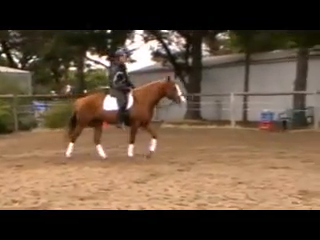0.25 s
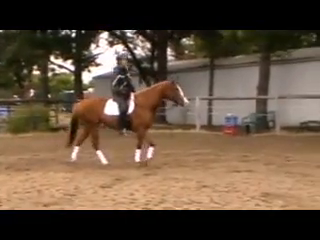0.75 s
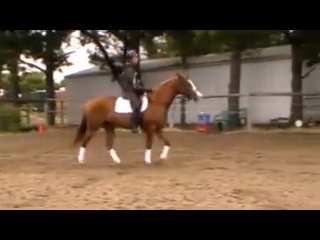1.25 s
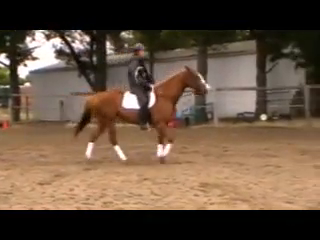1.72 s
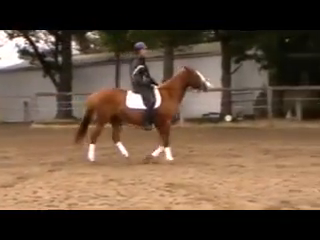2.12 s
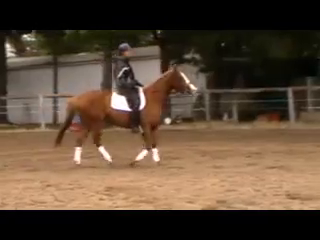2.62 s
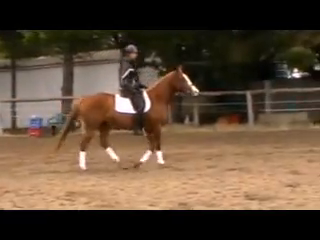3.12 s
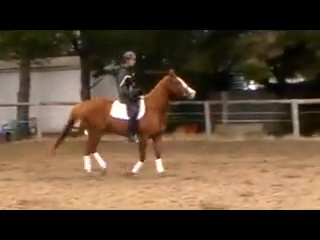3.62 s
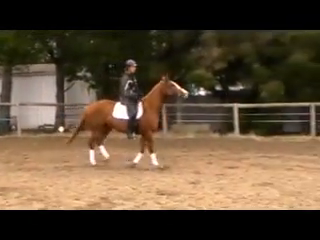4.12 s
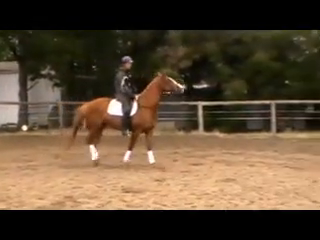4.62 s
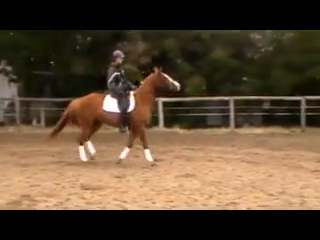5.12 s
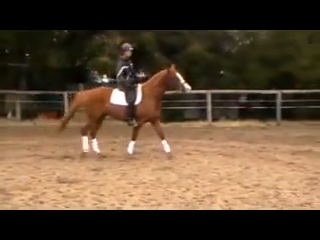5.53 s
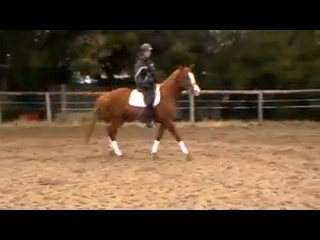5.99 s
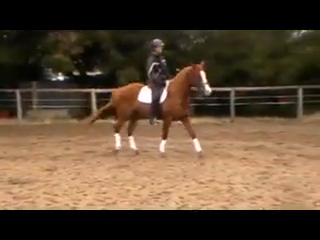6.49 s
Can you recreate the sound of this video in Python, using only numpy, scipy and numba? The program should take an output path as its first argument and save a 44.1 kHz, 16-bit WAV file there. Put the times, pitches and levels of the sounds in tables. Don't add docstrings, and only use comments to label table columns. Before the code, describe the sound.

Small birds chirp over wind-buffeted air and soft hoofsteps on sand, then a nearby horse gives a short shrill whinny, a quavering trill and a grunt.

```python
import sys
import numpy as np
from scipy import signal
from scipy.fft import rfft, irfft
from scipy.io import wavfile
from scipy.ndimage import uniform_filter1d
from numba import njit

SR = 44100
rng = np.random.default_rng(int(sys.argv[2]) if len(sys.argv) > 2 else 0)


def natural_amplitude(level_db):
    exponent = np.asarray(level_db, float) / 20
    return 10 ** exponent


def dump(signal):
    limited = np.clip(np.atleast_2d(signal).T, -1, 1)
    pcm = np.round(limited * 32767).astype(np.int16)
    wavfile.write(sys.argv[1], SR, pcm)


N = 297807

# from t/s, whole lines level/dB, half lines level/dB, upper lines level/dB, waver 0-1
REGISTERS = [
    (0, 0, -28, -11, .5),
    (4.25, -8, 0, 7, 0.09),
    (4.398, -1.3, -7, -2.5, 0.83),
]
# t/s, centre f/Hz, swing of the quaver f/Hz, effort level/dB
TRILL = [(4.64, 237.7, 27, -22), (4.68, 258, 21, -20), (4.9, 256.2, 31.4, -21), (5.03, 212.7, 38.2, -18),
         (5.22, 189.7, 34.6, -15.5), (5.275, 160, 22.5, -20.5), (5.33, 158.5, 3.06, -12),
         (5.375, 153.3, 1.14, -31.5), (5.52, 149.5, 1.4, -50)]
# from t/s, tilt/dB per octave
CLOSING = [(0, -4), (5.255, -7)]
# f/Hz, width/Hz, level/dB
THROAT = [(563, 43, -3), (967, 37, -2), (1620, 80, 4), (1982, 30, 1), (2262, 34, 6.5), (3220, 520, 1),
          (3800, 26, -4), (4200, 21, -21), (5770, 41, -6.5)]
# f/Hz, width/Hz, level/dB
GRUNT_THROAT = [(579, 17, -2), (1018, 31, 0.5), (1555, 26, -4), (1925, 47, -6), (2940, 45, -5),
                (3550, 70, -8), (4900, 200, -10)]


def level(x, db):
    return x * natural_amplitude(db) / np.sqrt(np.mean(x ** 2))


def curves(table):
    s, *columns = np.transpose(table)
    t = np.arange(N) / SR
    gate = np.clip(np.minimum(t - s[0], s[-1] - t) / 0.019, 0, 1)
    return [np.interp(t, s, c) for c in columns] + [gate]


def stages(table):
    s, *columns = np.transpose(table)
    row = np.searchsorted(s, np.arange(N) / SR, "right") - 1
    return [uniform_filter1d(c[row], int(.015 * SR)) for c in columns]


def noise():
    return rng.standard_normal(N)


def colour(x, points):
    hz, db = np.transpose(points)
    f = np.maximum(np.arange(N // 2 + 1) * SR / N, 1)
    return level(irfft(rfft(x) * natural_amplitude(np.interp(np.log(f), np.log(hz), db)), N), 0)


def walk(rate):
    k = int(SR / rate)
    held = np.repeat(rng.standard_normal(N // k + 1), k)
    return 1.5 * uniform_filter1d(uniform_filter1d(held, k), k)[:N]


def turn(hz):
    return 2 * np.pi * np.cumsum(hz) / SR


@njit
def sweep(x, hz, width):
    y, b, l = np.empty(len(x)), 0., 0.
    for i in range(len(x)):
        g, k = np.tan(np.pi * hz[i] / SR), width / hz[i]
        v = (b + g * (x[i] - l)) / (1 + g * (g + k))
        b, l, y[i] = 2 * v - b, l + 2 * g * v, k * v
    return y


def svf(x, hz, width):
    return sweep(x, hz * np.ones(len(x)), 1. * width)


def twice(x, hz, width):
    return svf(svf(x, hz, width), hz, width)


def dull(x):
    return signal.sosfilt(signal.ellip(8, .3, 50, 11500, fs=SR, output="sos"), x)


def air():
    # f/Hz, level/dB per Hz
    spectrum = [(15, -37), (25, -0.5), (103, -2.5), (456, -9), (712, -7), (833, -13), (1030, -11),
                (1920, -19), (2140, -19.5), (7700, -25), (11250, -34.5), (11600, -88), (13000, -95)]
    # f/Hz, level/dB
    unshared = [(60, -2.5), (250, -23), (600, -11), (1500, -5.5), (4000, -2), (13000, 2.5)]
    mid = colour(noise(), spectrum)
    side = level(colour(colour(noise(), spectrum), unshared), -12)
    return natural_amplitude(-47.5 + walk(4.49)) * (mid + side * np.array([[1], [-1]]))


def wind():
    # t/s, level/dB
    gusts = [(0.0, -37), (0.17, -42), (0.45, -28), (0.51, -48), (0.62, -31.5), (1.03, -60), (1.67, -37.5),
             (1.77, -62), (1.96, -43), (3.8, -60), (4.04, -61), (4.14, -44.5), (4.27, -59), (4.48, -41.5),
             (5.75, -46.5), (5.81, -35.5), (6.36, -44.5), (6.75, -28.5)]
    # f/Hz, level/dB per Hz
    eddy_spectrum = [(12, -49), (20, -35), (44, 0), (127, 2), (340, -13), (420, -19), (824, -32.5),
                     (1310, -38.5), (2000, -57), (2600, -76), (4400, -120)]
    # t/s, peak level/dB, left minus right level/dB
    pops = [(0.114, -21, -4), (0.242, -42, -8), (0.262, -22.5, -13), (0.351, -17, -10), (0.372, -18.5, -10),
            (0.45, -29, -1), (0.618, -21.5, 7), (0.684, -19.5, 0), (1.625, -24, 8), (1.653, -20, 15),
            (1.95, -29, 17.5), (2.049, -25, 9), (6.569, -22.5, -8), (6.712, -30, 1)]
    db, _ = curves(gusts)
    shared, out = noise(), []
    grit = level(twice(shared, 600., 700.), 0)
    u = np.arange(700) / SR
    thump = (1 - np.exp(-u / .0004)) * np.sin(2 * np.pi * 170 * u + .5) * np.exp(-u / .004)
    crackle = u / .0025 * np.exp(1 - u / .0025)
    for side in (1, -1):
        eddies = colour((0.95 * shared + noise()) * natural_amplitude(3.2 * walk(25)), eddy_spectrum)
        upper = svf(svf(eddies, 350.0, 720.0), 290.0, 1000.0)
        port = natural_amplitude(db + side * 0.7 + 5.5) * (eddies - upper + natural_amplitude(0.21 * (db + 38.5)) * upper)
        for s, pop_db, pan_db in pops:
            i = int(s * SR)
            port_db = pop_db + side * pan_db / 2
            port[i:i + 700] += natural_amplitude(port_db) * thump
            port[i:i + 700] += natural_amplitude(port_db - 21) * grit[i:i + 700] * crackle
        out.append(port)
    return np.array(out)


def sand():
    return noise() * natural_amplitude(1.2 * rng.exponential(1, N // 40 + 1)).repeat(40)[:N]


def hooves():
    # t/s, spray peak level/dB, low thud level/dB
    steps = [(0.9537, -49, -65), (1.5204, -47.5, -48), (2.0194, -48, -64), (2.485, -43, -51),
             (2.9904, -50, -57), (3.483, -52, -49), (3.5508, -51, -48), (5.6173, -43, -46.5)]
    t, spray, thud = np.arange(N) / SR, 0, 0
    for s, db, thud_db in steps:
        fade = (t > s) * np.exp(-np.maximum(t - s, 0) / 0.023)
        spray = spray + natural_amplitude(db) * fade
        thud = thud + natural_amplitude(thud_db) * fade
    grains = level(svf(svf(sand(), 7500.0, 4100.0), 5100.0, 5800.0), -2.4)
    return dull(spray * grains + thud * level(svf(noise(), 370.0, 800.0), 0))


def drag():
    # t/s, level/dB
    pull = [(2.82, -77), (2.87, -53), (3.03, -55)]
    db, gate = curves(pull)
    grains = sand()
    scrape = level(svf(grains, 1870.0, 700.), 0)
    scrape = scrape + level(svf(grains, 3400.0, 1500.), -1.5)
    scrape = scrape + level(svf(grains, 5900.0, 3000.), -19)
    return dull(gate * natural_amplitude(db) * scrape)


def tack():
    # t/s, peak level/dB, centre f/Hz, width as a share of the centre
    ticks = [(0.033, -39, 5600, 0.16), (0.591, -30, 7300, 0.35), (1.017, -42, 8100, 0.15),
             (2.717, -43, 7500, 0.47), (4, -33, 2080, 0.21), (4.034, -18.5, 4500, 1.8),
             (4.075, -33, 2220, 0.71), (4.105, -34, 3150, 0.57), (2.066, -44, 4500, .6),
             (5.504, -39, 8790, 0.36), (5.569, -42, 9060, 0.38), (5.737, -36, 3470, 1),
             (6.252, -31, 3300, .9)]
    out, snap = np.zeros(N), noise()
    for s, db, hz, share in ticks:
        i = int(s * SR)
        burst = snap[i:i + 600] * np.exp(-np.arange(600) / (.0016 * SR))
        width = hz * np.clip(share, .1, 2)
        burst = svf(svf(burst, 1. * hz, width), 1. * hz, 2 * width)
        out[i:i + 600] += natural_amplitude(db) * burst / np.abs(burst).max()
    return out


def strokes(bird, rise, fall, hook, arch):
    pitches = {"rise": lambda d, top: (top - rise * d, top - 0.51 * rise * d, top),
               "hook": lambda d, top: (hook * top, top - 0.144 * (1 - hook) * top, top),
               "flat": lambda d, top: (top, top, top),
               "arch": lambda d, top: (arch * top, top, arch * top),
               "fall": lambda d, top: (top, top - 0.57 * fall * d, top - fall * d)}
    return [(s, d, *pitches[shape](d, top), db) for shape, rows in bird.items() for s, d, top, db in rows]


def birds(song, warble, flutter_db, second_db, burr):
    out, shake, flutter, grit = np.zeros(N), walk(300), walk(250), walk(2500)
    breath = level(twice(noise(), 9000.0, 2200.0), -28)
    for s, length, start_hz, middle_hz, end_hz, db in song:
        u = np.linspace(0, 1, int(length * SR))
        i = int(s * SR) + np.arange(len(u))
        glide = np.polyval(np.polyfit([0, .5, 1], [start_hz, middle_hz, end_hz], 2), u)
        phase = turn(glide * (1 + warble * shake[i] * min(1., 0.0318 / length)))
        swell = np.sin(np.pi * u) ** .45 * natural_amplitude(db + flutter_db * flutter[i])
        out[i] += swell * ((1 + burr * grit[i]) * np.sin(phase) + breath[i])
        octave = np.clip((7000 - glide) / 1200, 0, 1) * (end_hz > start_hz)
        out[i] += swell * octave * natural_amplitude(second_db) * (1 + .5 * grit[i]) * np.sin(2 * phase)
    return out


def high_bird():
    song = { "rise": [(1.067, 0.036, 6300, -47), (1.779, 0.054, 6900, -38), (2.325, 0.017, 6660, -38),
            (6.343, 0.013, 6300, -30)], "hook": [(1.1, 0.053, 6800, -36), (4.295, 0.06, 7480, -26.5),
            (4.42, 0.056, 7470, -33), (6.108, 0.038, 7300, -31), (6.425, 0.036, 6620, -26),
            (6.592, 0.0454, 7520, -23), (2.305, 0.024, 5330, -46), (6.325, 0.03, 5180, -40)],
            "arch": [(1.79, 0.043, 7050, -32.5), (1.82, 0.033, 6930, -29.5), (2.34, 0.036, 7050, -28),
            (5.837, 0.032, 7090, -22.5), (6.358, 0.05, 6830, -25), (6.39, 0.045, 7170, -30)],
            "flat": [(0.003, .06, 7300, -55), (.07, .025, 7100, -58)], "fall": [(2.365, 0.016, 6900, -38),
            (6.638, .022, 7400, -33)]}
    song = strokes(song, rise=51500, fall=85000, hook=.89, arch=0.84)
    return birds(song, warble=0.0083, flutter_db=2.9, second_db=-15, burr=0.18)


def low_birds():
    climbs = { "rise": [(.553, 0.021, 5330, -42.5), (1.26, 0.041, 4660, -44.5), (2.105, .028, 5320, -40),
              (2.126, .027, 4680, -33.5), (2.163, 0.023, 4530, -44), (3.348, 0.036, 5400, -39),
              (3.36, 0.019, 5210, -58)], "hook": [(.05, 0.043, 4400, -49), (.077, 0.038, 4520, -43),
              (.105, 0.054, 4100, -47), (.572, 0.042, 4220, -32), (.565, .015, 3600, -44),
              (.672, 0.03, 3700, -42), (.952, 0.036, 4430, -40.5), (2.18, 0.03, 3700, -39),
              (2.775, 0.039, 4570, -47.5), (3.04, 0.019, 4230, -54), (3.45, 0.035, 4130, -40.5),
              (6.71, .035, 4480, -51)]}
    drops = { "arch": [(.632, 0.047, 3585, -37.5), (.883, 0.029, 4420, -41.5), (.887, 0.015, 4950, -48),
             (.987, 0.024, 3800, -42.5), (1.14, 0.021, 4780, -47), (1.183, 0.022, 3380, -48),
             (1.293, 0.029, 5060, -31), (1.385, 0.039, 3850, -39), (1.393, 0.023, 4610, -37),
             (2.39, 0.036, 4700, -42.5), (3.183, 0.071, 3940, -47), (2.33, 0.027, 4640, -47),
             (2.365, 0.028, 3800, -47.5), (2.165, 0.011, 5100, -50), (5.6, 0.027, 4350, -46),
             (5.64, 0.029, 4300, -49)], "fall": [(.14, 0.023, 3900, -44), (.724, 0.016, 3650, -45),
             (.606, .01, 3800, -36), (.616, .008, 3700, -36), (.624, .012, 3700, -38),
             (.156, .014, 3500, -47), (1.32, 0.039, 4540, -44), (1.43, 0.013, 4580, -41.5),
             (2.148, 0.013, 3530, -35), (2.205, 0.014, 3510, -33.5), (2.44, 0.039, 4520, -50),
             (2.812, 0.028, 3990, -48), (3.385, 0.016, 5280, -34), (3.39, 0.028, 5200, -46),
             (3.462, 0.02, 5000, -44), (6.395, 0.022, 4870, -34.5), (2.415, .025, 4660, -49),
             (2.143, 0.0062, 5160, -37), (2.078, .008, 4800, -46), (2.085, .008, 4200, -50)]}
    song = strokes({**climbs, **drops}, rise=42000, fall=38000, hook=.79, arch=0.73)
    return birds(song, warble=0.0319, flutter_db=1.84, second_db=-24.0, burr=0.22)


@njit
def walls(x, lags, gain, drift):
    line, out, y = np.zeros((8, 8192)), np.zeros((2, len(x))), np.zeros(8)
    for i in range(len(x)):
        total = 0.
        for k in range(8):
            lag = lags[k] + drift[(i + 4000 * k) % len(x)]
            j = int(lag)
            y[k] = gain[k] * ((j + 1 - lag) * line[k, (i - j) & 8191] + (lag - j) * line[k, (i - j - 1) & 8191])
            out[k % 2, i] += y[k]
            total += y[k]
        for k in range(8):
            line[k, i & 8191] = x[i] + y[k] - total / 4
    return out


def sheds(voice, high, low):
    lags = rng.integers(250, 2300, 8)
    leaves = svf(high + natural_amplitude(1.5) * low, 6100.0, 6700.0) * (.5 + walk(500) + .5 * walk(1800))
    sent = natural_amplitude(-12.0) * leaves + natural_amplitude(-19.0) * voice * (.3 + walk(250))
    echo = dull(walls(sent, lags, natural_amplitude(-60 * lags / SR / 0.5), 4.98 * walk(25)))
    return echo + 0.47 * echo[::-1]


def throat(x, modes, tilt_db, stretch, widen, patchy_db):
    out = 0
    for k, (f, w, db) in enumerate(modes):
        gain = (-1) ** k * natural_amplitude(db + tilt_db * np.log2(f / 1000) + patchy_db * walk(22))
        out = out + gain * svf(x, f * stretch, widen * w) / np.sqrt(w / 100)
    return out


def folds(hz, chest_db, buzz_db, pair, modes, stretch, jitter, scatter_db, tilt_db, second_db, third_db,
          body_db, start_s):
    phase = turn(hz * (1 + jitter * walk(120)))
    phase = np.maximum(phase - phase[int(start_s * SR)], 0)
    cycle = (phase / (2 * np.pi)).astype(int)
    size = natural_amplitude(scatter_db * rng.standard_normal(N // 50))[cycle] * (1 - pair * (cycle % 2))
    clicks = np.diff(cycle, prepend=0) * size * np.sqrt(SR / hz)
    clicks = signal.lfilter([.25], [1, -.75], clicks) * (1 + .5 * noise())
    third = svf(svf(natural_amplitude(2.5 * walk(90)) * np.sin(3 * phase), 578.0, 240.0), 595.0, 270.0)
    chest = np.sin(phase) + natural_amplitude(second_db) * np.sin(2 * phase) + natural_amplitude(third_db) * third
    ring = throat(clicks, modes, tilt_db, stretch, widen=2.2, patchy_db=1.5)
    ring = ring + natural_amplitude(body_db) * svf(clicks, 150.0, 60.0)
    return np.sqrt(2) * natural_amplitude(chest_db) * chest + natural_amplitude(buzz_db + 12.5) * ring, phase


def flaps():
    # t/s, length/s, f/Hz, level/dB
    squeaks = [(5.774, 0.017, 3100, -21), (5.801, .016, 3040, -17), (5.824, 0.0074, 3590, -13),
               (5.83, 0.0088, 3270, -19), (5.845, .008, 3620, -20)]
    out, burr, spit = np.zeros(N), walk(1500), level(svf(noise(), 4500.0, 6500.0), -15)
    for s, length, hz, db in squeaks:
        u = np.linspace(0, 1, int(length * SR))
        i = int(s * SR) + np.arange(len(u))
        tone = np.sin(turn(hz * (1 + 0.067 * (u - .5)))) * (1 + 0.56 * burr[i])
        out[i] += natural_amplitude(db) * np.sqrt(np.sin(np.pi * u).clip(0)) * (tone + spit[i])
    return out


def lips(breath):
    # t/s, centre f/Hz, level/dB
    gap = [(4.55, 3120, -40), (4.62, 3060, -24), (4.76, 3150, -28), (4.85, 3600, -40), (4.94, 3420, -26),
           (5.1, 3340, -27), (5.14, 3360, -40), (5.18, 3300, -29), (5.24, 3600, -45)]
    hz, db, gate = curves(gap)
    return gate * natural_amplitude(db) * level(twice(breath, hz, 350.), 0)


def rasp(puff, breath, stretch, surge_db, gate, grunt_gate):
    # t/s, airflow level/dB, mouth opening as treble level/dB
    flows = [
        [(4.12, -64, -6.5), (4.15, -30.5, -11.5), (4.22, -24.5, 1.5), (4.27, -29, 9.5), (4.4, -21, 2),
         (4.6, -18.5, -4.5)],
        [(4.72, -14, -6.5), (4.88, -16, -7), (5.0, -17.5, -6.5), (5.15, -20, -3), (5.17, -16.5, -9),
         (5.245, -19.5, -7.5), (5.27, -26, -0.5), (5.4, -29, 0), (5.43, -46, 1)],
        [(5.72, -39.5, 2), (5.78, -36, 12.5), (5.95, -29.5, 2), (6.1, -24.5, -2), (6.16, -33.5, -2),
         (6.22, -37, 2.5), (6.272, -41.5, 2), (6.29, -70, -14)],
    ]
    # f/Hz, level/dB per Hz
    hiss_spectrum = [(1470, -21), (2500, 1), (2590, -39), (3340, 1.5), (4700, -7), (5810, -3), (9010, -5),
                     (12200, -17.5), (13600, -43)]
    # from t/s, level over the hiss/dB
    nostrils = [(0, -60), (5.74, -17), (5.88, -5), (5.94, -9), (5.98, -18), (6.145, -10.5), (6.26, -30)]
    db, treble_db, _ = curves(sum(map(list, flows), []))
    tight_db = stages([(0, 0), (REGISTERS[1][0], -9), (REGISTERS[2][0], 0)])[0]
    db, treble_db = db + tight_db + surge_db, treble_db - 0.53 * tight_db
    open_db = 2.5 + 0.21 * treble_db + gate * (stages(CLOSING)[0] - CLOSING[0][1])
    on = curves(list(flows[0]) + list(flows[1]))[-1] + curves(flows[2])[-1]
    low = throat(breath * (1 - grunt_gate), THROAT, open_db - 1.5, stretch, widen=2.1, patchy_db=1.6)
    low += natural_amplitude(4) * throat(breath * grunt_gate, GRUNT_THROAT, open_db, stretch, widen=3.6, patchy_db=3.)
    hiss = colour(puff * noise(), hiss_spectrum)
    high = sum(natural_amplitude(2.0 * walk(28)) * svf(hiss, f * stretch, f / 8) for f in 3000 * 1.2 ** np.arange(9))
    nose = natural_amplitude(stages(nostrils)[0]) * level(twice(puff ** 2 * noise(), 8250.0, 500.), 0)
    return on * natural_amplitude(db - 1.5) * (level(low, 0) + natural_amplitude(treble_db - 5.0) * (level(high, 0) + 2.26 * nose))


def grunt(stretch):
    # t/s, fold rate f/Hz, level/dB
    effort = [(5.73, 39.41, -54), (5.79, 40.35, -35.5), (5.85, 49.14, -28), (5.91, 66.2, -30.5),
              (5.96, 75.6, -28), (6.1, 75.16, -24.5), (6.17, 57.8, -23.5), (6.23, 54.05, -34),
              (6.33, 56.4, -77)]
    # from t/s, rate factor, chest tone over effort/dB, strong-weak 0-1
    modes_of_swing = [
        (0, 1.001, -8, .05),
        (5.96, 1.97, -3, 0.23),
        (6.25, 1.8, 13.5, 0),
    ]
    hz, buzz_db, gate = curves(effort)
    factor, over_db, pair = stages(modes_of_swing)
    sound, phase = folds(hz * factor, buzz_db + over_db, buzz_db, np.clip(pair, 0, 1), GRUNT_THROAT, stretch,
                         jitter=.03 + .07 * (factor > 1.5), scatter_db=2.0, tilt_db=-2.5, second_db=-11.0,
                         third_db=0.5, body_db=11.0, start_s=5.7285)
    return sound, phase, gate


def quaver():
    low_s = 5.026
    centre_hz, swing_hz, effort_db, gate = curves(TRILL)
    since = np.arange(N) / SR - low_s
    shake_hz = np.where(since < 0, 7.5, 7.95)
    off_hz = -swing_hz * np.cos(2 * np.pi * shake_hz * since)
    hz = centre_hz + off_hz
    chest_db = effort_db - .7 * np.maximum(hz - 246, 0)
    buzz_db = effort_db - 10.5 + 0.2652 * off_hz
    surge_db = gate * .05 * off_hz
    return hz, chest_db, buzz_db, surge_db, gate


def whistle():
    # t/s, f/Hz, effort level/dB
    tone = [(4.13, 951.5, -47), (4.175, 1277, -26), (4.21, 1348, -21), (4.255, 1442, -27),
            (4.39, 1489, -19), (4.47, 1491, -16.5), (4.51, 1560, -17), (4.595, 1520, -17),
            (4.64, 1513, -40)]
    # multiple of half the pitch, level/dB
    line_levels = [(1, -12.5), (2, 6), (3, 7), (4, 3.5), (5, 4.5), (6, 0.5), (7, -30), (8, -12), (9, -22),
                   (10, -25), (11, -14), (12, -19), (13, -15), (14, -14), (15, -26), (16, -29), (17, -30)]
    # t/s, f/Hz, level/dB
    hum = [(4.44, 534.5, -45), (4.53, 583, -24.5), (4.6, 624, -26), (4.64, 588, -16.5), (4.68, 551, -31),
           (4.72, 591.3, -20), (4.8, 555.7, -34), (4.855, 599, -24.5), (4.93, 619.4, -34)]
    hz, effort_db, gate = curves(tone)
    whole_db, half_db, upper_db, waver = stages(REGISTERS)
    whole_db, half_db = effort_db + whole_db, effort_db + half_db
    break_s = REGISTERS[2][0]
    hz = hz * stages([(0, 1), (break_s, 1.035)])[0]
    phase = turn(hz * (1 + 0.0183 * np.clip(waver, 0, 1) * walk(90))) / 2
    drown_db = 14 * np.clip((np.arange(N) / SR - break_s) / 0.092, 0, 1)
    lines = dict(line_levels)
    out = 0
    for k, db in lines.items():
        db = db - 9 * (k == 4) * (hz < 1530) - drown_db * (k > 4)
        if k % 2:
            own_db = half_db - lines[3]
        else:
            own_db = whole_db - lines[2] + upper_db * (k > 2)
        out = out + natural_amplitude(db + own_db + 1.6 * waver * walk(60)) * np.sin(k * phase)
    hum_hz, hum_db, hum_gate = curves(hum)
    low = turn(hum_hz * (1 + 0.0299 * walk(60)))
    mix = natural_amplitude(1) * np.sin(2 * phase + low) + natural_amplitude(-28) * np.sin(2 * phase - low)
    return np.sqrt(2) * (gate * out + hum_gate * natural_amplitude(hum_db) * (np.sin(low) + gate * mix))


def horse():
    # f/Hz, width/Hz, share removed
    nasal_dips = [(393, 136, 0.74), (2610, 440, 0.76), (5080, 390, 0.85)]
    hz, chest_db, buzz_db, surge_db, gate = quaver()
    stretch = 1 + .05 * gate * (hz / uniform_filter1d(hz, SR // 8) - 1) + .012 * walk(18)
    trill, phase = folds(hz, chest_db, buzz_db, 0., THROAT[:7], stretch, jitter=.03, scatter_db=4.5,
                         tilt_db=stages(CLOSING)[0], second_db=-19.5, third_db=-10.5, body_db=-41,
                         start_s=TRILL[0][0])
    knocks, knock_phase, knock_gate = grunt(stretch)
    puff = 1 + .3 * gate * np.cos(phase) + .65 * knock_gate * np.cos(knock_phase - .5)
    puff = puff * natural_amplitude(1.5 * walk(55))
    breath = puff * noise()
    voice = whistle() + gate * trill + knock_gate * knocks
    voice = voice + rasp(puff, breath, stretch, surge_db, gate, knock_gate) + lips(breath) + flaps()
    for f, w, share in nasal_dips:
        voice = voice - share * svf(voice, f, w)
    return voice


def scene():
    voice, high, low = horse(), high_bird(), low_birds()
    song = np.array([high + np.roll(low, 1), natural_amplitude(0.5) * np.roll(high, 1) + natural_amplitude(-3.5) * low])
    near = np.array([natural_amplitude(-0.66) * voice, natural_amplitude(1.26) * (0.38 * voice + 0.3 * np.roll(voice, 1))])
    ground = hooves() + drag() + tack()
    return near + song + sheds(voice, high, low) + ground + wind() + air()


def band_limit(x):
    return signal.sosfilt(signal.butter(12, 13740, fs=SR, output="sos"), x)


def record(dry):
    return band_limit(dry)


dry = scene()
out = record(dry)
dump(out)
```